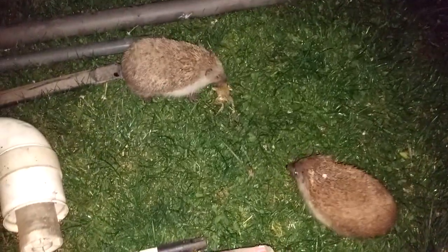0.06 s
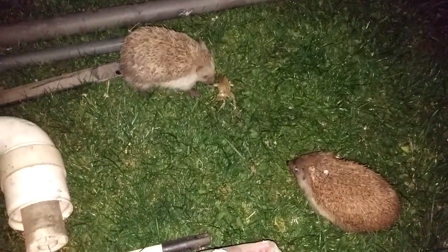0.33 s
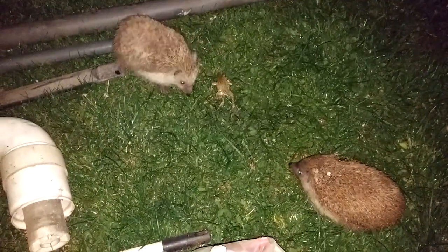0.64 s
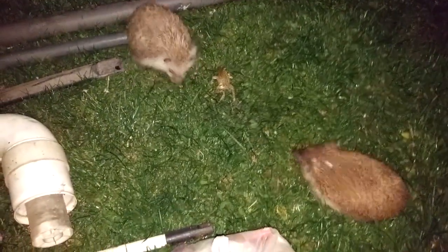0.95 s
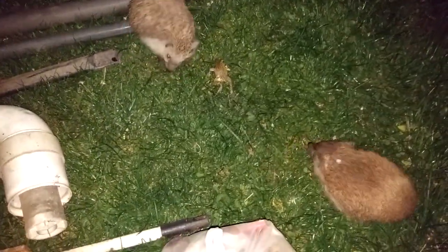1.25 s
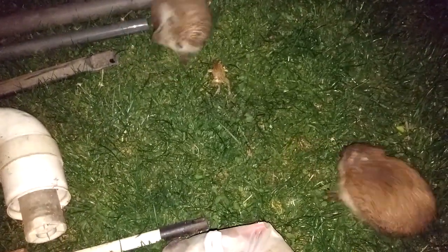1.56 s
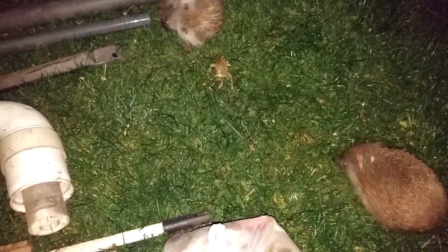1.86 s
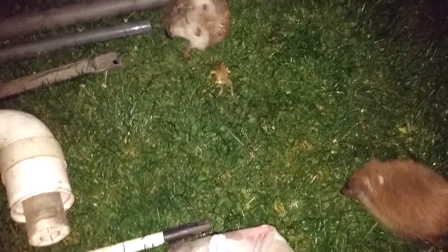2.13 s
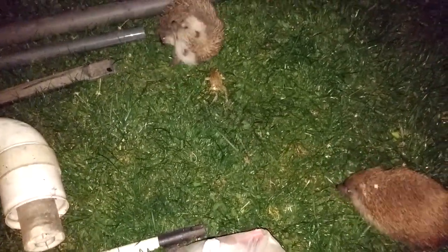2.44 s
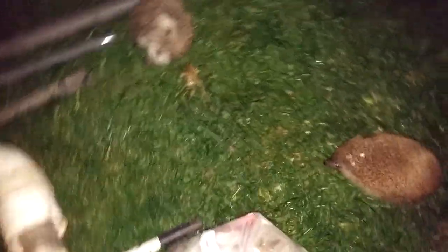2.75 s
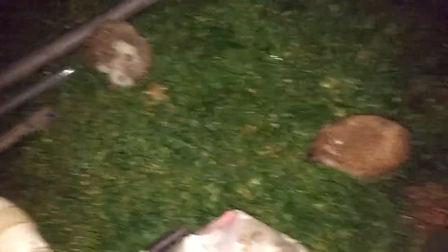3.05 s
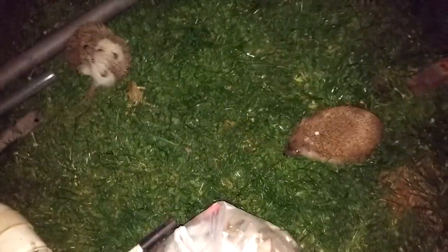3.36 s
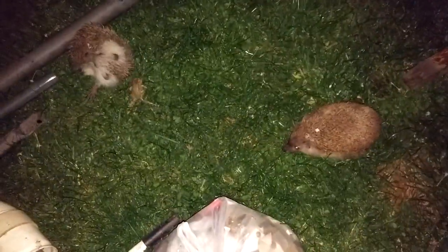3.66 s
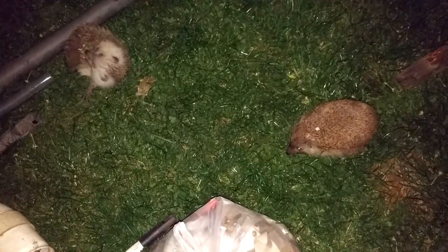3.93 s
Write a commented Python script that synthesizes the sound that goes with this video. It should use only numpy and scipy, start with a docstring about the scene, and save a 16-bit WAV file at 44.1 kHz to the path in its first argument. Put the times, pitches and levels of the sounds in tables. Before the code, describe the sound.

Short breathy hedgehog puffs over a low outdoor hum, then microphone taps and a sharp knock.

```python
"""A dull outdoor hum of noise lies over a lawn at night, where two hedgehogs face each other.
From the start, one huffs three or four times a second: its nostrils open with a soft pop, then air
hisses through them over a low rush and an uneven flutter. Near 0.9 s a dry grass stalk clicks.
From 2.7 s to 3.5 s fingers tap softly near the right microphone of the hand-held recorder,
and among the taps, near 3.1 s, one sharp knock makes its case ring."""
import sys
import numpy as np
from scipy import signal
from scipy.fft import rfft, irfft
from scipy.io import wavfile

SR = 44100
rng = np.random.default_rng(int(sys.argv[2]) if len(sys.argv) > 2 else 0)


def output_pcm(signal):
    """Save a mono or channel-first signal as 16-bit PCM at the path in sys.argv[1].

    Samples are clipped to [-1, 1] before scaling.
    """
    pcm = np.clip(np.atleast_2d(signal).T, -1, 1) * 32767
    wavfile.write(sys.argv[1], SR, np.round(pcm).astype(np.int16))


N = 176400

# One row per huff. The sag is how far the rush fades; treble is a boost to the top of the hiss.
# start_s, length_s, hiss_db, rush_db, flutter_db, nostril_hz, sag_db, treble_db
HUFFS = [(.011, 0.056, -58.5, -48.5, -56, 3870, 7.5, -2), (0.068, 0.047, -68, -52.5, -78, 3700, 9, 1),
         (.388, 0.032, -59.5, -52, -59, 3450, 6, 5.5), (0.578, 0.095, -57, -54, -50, 3670, 2.5, 3),
         (0.831, 0.037, -54.5, -50.5, -46.5, 3700, 8, 0.5), (1.012, .059, -53.5, -54, -54, 3580, -6, 1.5),
         (1.215, 0.078, -54, -53, -54, 3630, 6, 1.5), (1.494, 0.077, -54.5, -58, -53, 3640, 5.5, 0),
         (1.860, 0.067, -55, -48, -55.5, 3710, 1.5, -1.5), (2.122, .060, -54.5, -55.5, -56.5, 3830, -2, 2),
         (2.441, 0.075, -54, -52.5, -54.5, 3900, -8.5, -0.5),
         (2.726, 0.066, -54.5, -45.5, -51, 3880, 0, -0.5),
         (2.964, .075, -54.5, -49.5, -50.5, 3730, 8, -1.5), (3.257, 0.066, -57, -55, -62.5, 3700, 6, 0),
         (3.56, 0.087, -60, -54.5, -64, 3700, 0, 0), (3.829, 0.11, -63, -52, -62, 3640, -2, -1)]


def from_db(db):
    """Turn decibels into a number to multiply by."""
    return 10 ** (np.asarray(db) / 20)


def rms_one(x):
    """Scale a sound so that its average strength (rms) is 1."""
    return x / np.sqrt(np.mean(x ** 2) + 1e-20)


def at_hz(points, hz, column=1):
    """Read between the rows of a table, with frequency spaced in octaves."""
    table = np.array(points)
    return np.interp(np.log(hz + 1e-3), np.log(table[:, 0]), table[:, column])


def pan(db):
    """Left and right gains: positive decibels lean left, negative lean right."""
    return from_db(np.array([[db], [-db]]) / 2)


def air_noise(spectrum, likeness, size, shift=1):
    """Shaped stereo noise. Likeness rows are (frequency_hz, likeness): 1 is the same in both ears."""
    hz = np.arange(size // 2 + 1) * SR / size
    mid, side = rfft(rng.standard_normal((2, size)))
    alike = np.clip(at_hz(likeness, hz), -1, 1)
    pair = np.sqrt(1 + alike) * mid + np.sqrt(1 - alike) * side * [[1], [-1]]
    return rms_one(irfft(pair * from_db(at_hz(spectrum, hz / shift)), size))


def click(start_s, db):
    """One click in silence."""
    out = np.zeros(N)
    out[int(start_s * SR)] = from_db(db)
    return out


def ring(clicks, hz, fade_s):
    """Each click starts a pure tone that dies away by 60 dB in fade_s."""
    decay = from_db(-60 / (fade_s * SR))
    angle = 2 * np.pi * hz / SR
    feedback = [1, -2 * decay * np.cos(angle), decay * decay]
    return signal.lfilter([0, decay * np.sin(angle)], feedback, clicks + 1e-18)


def resonance(x, hz, width_hz):
    """Let through a band of sound around one pitch."""
    decay = np.exp(-np.pi * width_hz / SR)
    feedback = [1, -2 * decay * np.cos(2 * np.pi * hz / SR), decay * decay]
    return signal.lfilter(np.array([1, 0, -1]) * (1 - decay * decay) / 2, feedback, x)


def keep_side(x, hz, kind, order=2):
    """Keep the "low" or the "high" side of a frequency; a higher order cuts more steeply."""
    return signal.sosfilt(signal.butter(order, min(hz, .45 * SR), kind, fs=SR, output="sos"), x + 1e-18)


def outdoors():
    """Dull outdoor noise slowly swells."""
    # Loudness over time: time_s, level_db
    swell = [(0, -58.5), (.5, -57), (1.1, -57), (1.7, -56), (2.2, -52.5), (2.65, -54), (3.1, -52),
             (3.6, -52.5), (4, -51.5)]
    # Tone of the noise: frequency_hz, level_db
    spectrum = [(25, 10), (42, -16), (54, 4.5), (110, 3), (220, -0.5), (450, -1.5), (900, 1), (1300, -2),
                (1800, -3), (2500, -12), (5000, -37)]
    # How alike the two ears are: frequency_hz, likeness (0 to 1)
    likeness = [(60, 1), (600, 0.84), (1000, 0.52), (1500, 0.24), (2400, 0), (15000, 0)]
    level_db = np.interp(np.arange(N) / SR, *np.transpose(swell))
    return from_db(level_db) * air_noise(spectrum, likeness, N) * pan(db=-1.65)


def microphone_hiss():
    """Each of the two microphones adds its own faint, steady hiss."""
    # Tone of the hiss: frequency_hz, left_db, right_db
    spectrum = [(500, 6, -1), (2260, 0.5, -34), (3060, 4.5, 0.5), (5350, -2, -3), (7240, -9.5, -9.5),
                (9900, -14, -15), (13000, -20.5, -22.5), (15500, -18, -15)]
    hz = np.arange(N // 2 + 1) * SR / N
    colour = from_db([at_hz(spectrum, hz, column=1), at_hz(spectrum, hz, column=2)])
    white = rfft(rng.standard_normal((2, N)))
    return from_db(-66.5) * rms_one(irfft(white * colour, N))


def puff(t, length_s, sag_db, arch_db):
    """Air flow of one huff: it rises, sinks by sag_db, bulges midway by arch_db and dies away."""
    rise_s, release_s = 0.01, 0.017
    along = np.clip(2 * t / length_s - 1, -1, 1)   # -1 at the start, 1 at the end
    hold = from_db(-sag_db * along / 2 + arch_db * (.5 - along ** 2))
    release = np.exp(-2 * np.maximum(t - length_s, 0) / release_s)
    return np.clip(t / rise_s, 0, 1) * hold * release


def huffs():
    """Each breath out makes a pop, a low rush of air, a flutter and a nostril hiss."""
    # Tone of the low rush: frequency_hz, level_db
    rush_spectrum = [(100, -32), (220, -3.5), (450, -1.5), (760, 0.5), (1100, 0.5), (1450, -19),
                     (1950, -10), (2600, -48), (5000, -44)]
    delay_s = 0.0038   # the hiss needs a moment of flow to start
    low_pan, hiss_pan = pan(db=-0.8), pan(db=-3.5)
    out, size = np.zeros((2, N + SR)), SR // 4
    t = np.arange(size) / SR
    for start_s, length_s, hiss_db, rush_db, flutter_db, nostril_hz, sag_db, treble_db in HUFFS:
        hiss = from_db(hiss_db) * nostril_hiss(size, nostril_hz, treble_db)
        rush = from_db(rush_db) * air_noise(rush_spectrum, [(900, 0.99), (2000, 0.64)], size)
        low = rush + from_db(flutter_db) * flutter(size)
        low *= puff(t, length_s, sag_db, arch_db=-3.5)   # eases while the nostrils are wide open
        hiss *= puff(t - delay_s, length_s - 2 * delay_s, sag_db=2.5, arch_db=2)
        start = int(start_s * SR)
        out[:, start:start + size] += low * low_pan + hiss * hiss_pan
    return out[:, :N] + pops() * low_pan


def flutter(size, count=40):
    """Soft tissue in the nose slaps at uneven intervals."""
    slaps_per_s, spread_db = 100, 1.5
    gaps = rng.uniform(.4, 1.6, count)
    at = (np.cumsum(gaps) * SR / slaps_per_s).astype(int) - SR // 200
    heard = (at >= 0) & (at < size)
    slaps = np.zeros(size)
    slaps[at[heard]] = from_db(spread_db * rng.uniform(-1, 1, count))[heard]
    nasal = resonance(slaps, hz=570, width_hz=450)
    return rms_one(keep_side(nasal, hz=1200, kind="low"))


def pops():
    """The nostrils open with a soft, low pop, louder when a louder hiss follows."""
    pop_db, delay_s = -40, 0.0025
    loudest_db = max(hiss_db for _, _, hiss_db, *_ in HUFFS)
    openings = sum(click(start_s + delay_s, pop_db + (hiss_db - loudest_db) / 2)
                   for start_s, _, hiss_db, *_ in HUFFS)
    return keep_side(ring(openings, hz=265, fade_s=0.0097), hz=108, kind="high")


def nostril_hiss(size, nostril_hz, treble_db):
    """Swirling air hisses in the nostrils and trembles because the flow is unsteady."""
    # Tone of the hiss when the nostrils ring at usual_hz: frequency_hz, level_db
    usual_spectrum = [(1500, -9), (2200, -5.5), (2850, -22.5), (3130, -7), (3400, 3), (3950, 0.5),
                      (4500, -7.5), (5200, -11.5), (6600, -25.5), (8500, -33), (10600, -29), (15000, -36)]
    usual_hz, treble_hz, tremble_db = 3700, 4400, 0.9
    spectrum = [(hz, db + treble_db * (hz > treble_hz)) for hz, db in usual_spectrum]
    likeness = [(2800, 0.4), (3600, 0.85), (5000, 0)]
    noise = air_noise(spectrum, likeness, size, shift=nostril_hz / usual_hz)
    tremble = rms_one(keep_side(rng.standard_normal(size), hz=129, kind="low"))
    return rms_one(noise * from_db(tremble_db * tremble))


def grass_tick():
    """A dry stalk clicks once and rings briefly."""
    # The snap of the stalk: start_s, level_db
    snaps = [(0.9353, -46.5)]
    # The tones it rings with: pitch_hz, level_db, fade_s
    stalk_tones = [(2050, 1, 0.03), (2250, -10, .016), (2800, -5, 0.01), (4400, -13, .014)]
    snap = sum(click(start_s, db) for start_s, db in snaps)
    return sum(from_db(db) * ring(snap, hz, fade_s) for hz, db, fade_s in stalk_tones) * pan(db=-5.0)


def finger_taps():
    """Soft fingers make the case ring for a few cycles, mostly at the right microphone."""
    # Touches on the case: start_s, level_db, pitch_hz
    touches = [(2.702, -33, 450), (2.717, -32.5, 400), (2.837, -29.5, 457), (2.885, -34.5, 210),
               (2.903, -33.5, 330), (2.922, -35.5, 295), (2.959, -30, 428), (3.020, -19.5, 540),
               (3.039, -28, 380), (3.1695, -17, 328), (3.179, -25, 235), (3.1994, -25, 320),
               (3.4, -16, 570), (3.505, -23.5, 510)]
    ring_cycles, left_db = 5.9, -23.5
    out = 0
    for start_s, db, hz in touches:
        touch = click(start_s, db)
        tone = ring(touch, hz, fade_s=ring_cycles / hz)
        thud = from_db(-15) * ring(touch, hz=170, fade_s=0.023)   # the case gives a little
        hollow = from_db(-6.5) * ring(touch, hz=694, fade_s=0.0069)
        out = out + tone + thud - hollow
    softened = keep_side(out, hz=820, kind="low", order=4)
    return keep_side(softened, hz=190, kind="high") * np.array([[from_db(left_db)], [1]])


def knock():
    """One hard hit sets all the natural tones of the case ringing."""
    # The hit on the case: start_s, level_db
    hits = [(3.089, 0)]
    # Natural tones of the case: pitch_hz, left_db, right_db, fade_s
    case_tones = [(506, -23, 1.5, 0.012), (830, -23, 0, 0.0069), (1153, -29.5, -11.5, 0.014),
                  (1658, -34, -9.5, 0.014), (1846, -44, -34, 0.067), (2380, -15, -3, 0.0068),
                  (3340, -31, 2, 0.0019), (3950, -37, -10, 0.025), (4085, -26, -9, 0.0057),
                  (5300, -23, -1.5, 0.0025), (10300, -38, -41, 0.0072)]
    contact = keep_side(sum(click(start_s, db) for start_s, db in hits), hz=8700, kind="low")
    # Neighbouring tones start their swing in opposite directions.
    body = sum((-1) ** k * from_db([[left_db], [right_db]]) * ring(contact, hz, fade_s)
               for k, (hz, left_db, right_db, fade_s) in enumerate(case_tones))
    return keep_side(body, hz=205, kind="high")


def scene():
    """The hedgehog, the grass and the handled recorder, over a quiet bed of noise."""
    return huffs() + grass_tick() + finger_taps() + knock() + outdoors() + microphone_hiss()


def record(dry):
    """The recorder drops the deepest bass, overloads on the knock and cuts the highest treble."""
    bass_cut_hz, treble_stop_hz = 46, 16800
    clipped = np.clip(keep_side(dry, bass_cut_hz, "high", order=8), -1, 1)
    return signal.sosfilt(signal.cheby2(16, 80, treble_stop_hz, fs=SR, output="sos"), clipped)


dry = scene()
out = record(dry)
output_pcm(out)
```